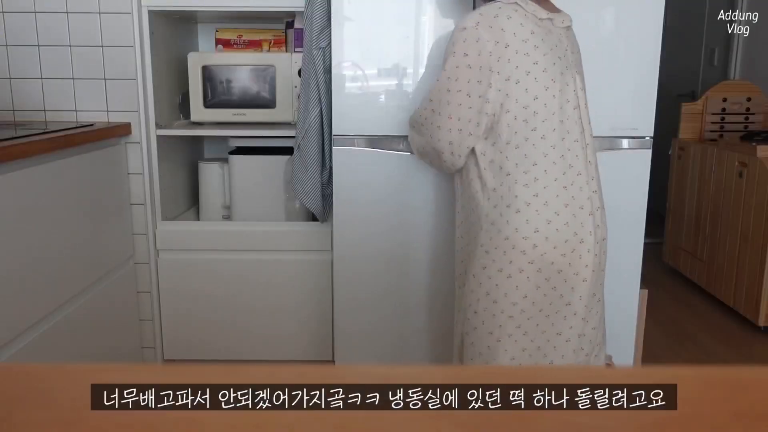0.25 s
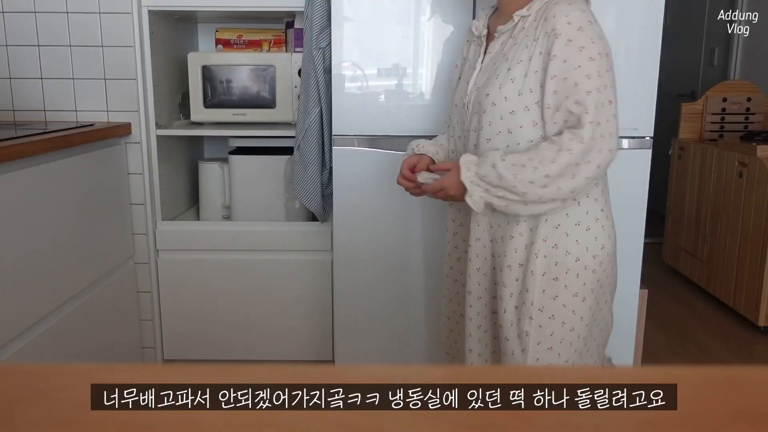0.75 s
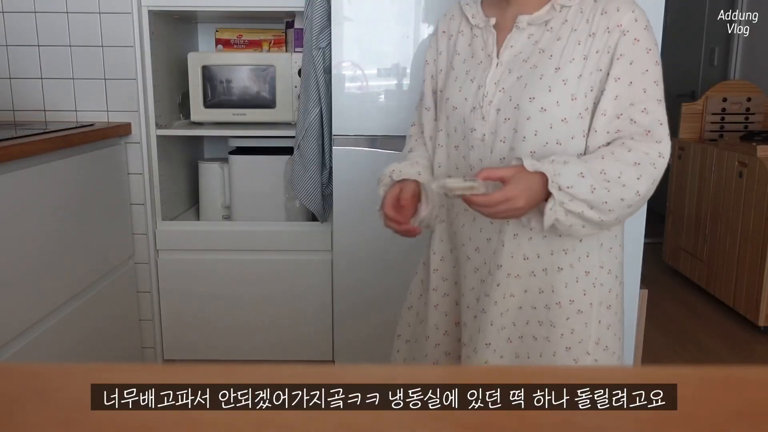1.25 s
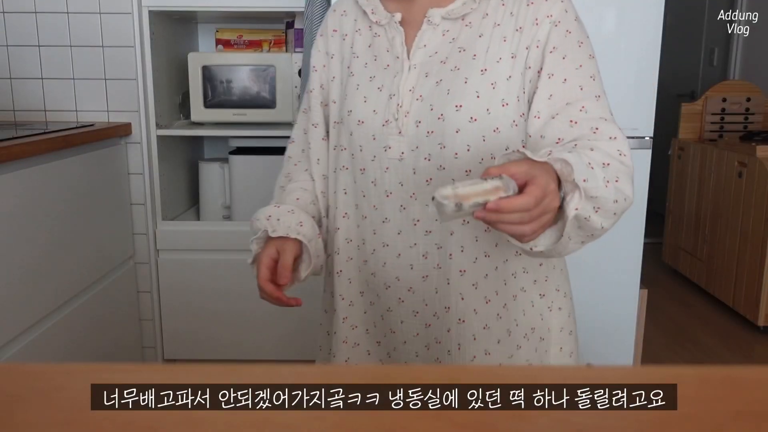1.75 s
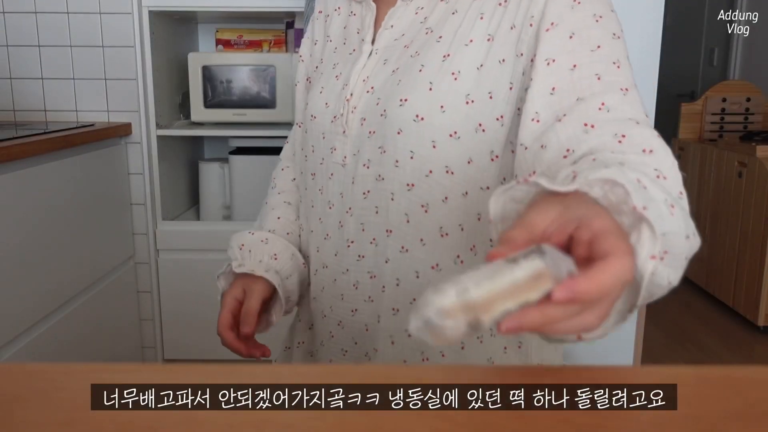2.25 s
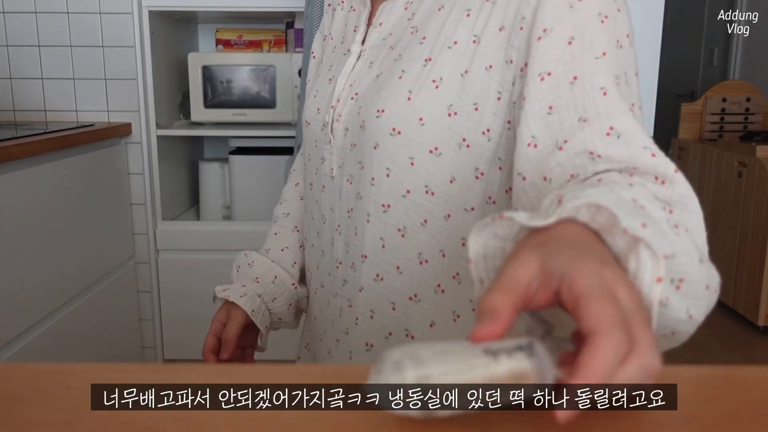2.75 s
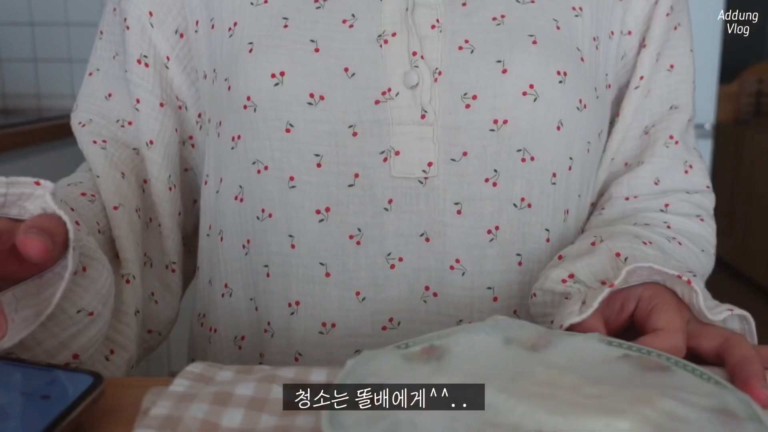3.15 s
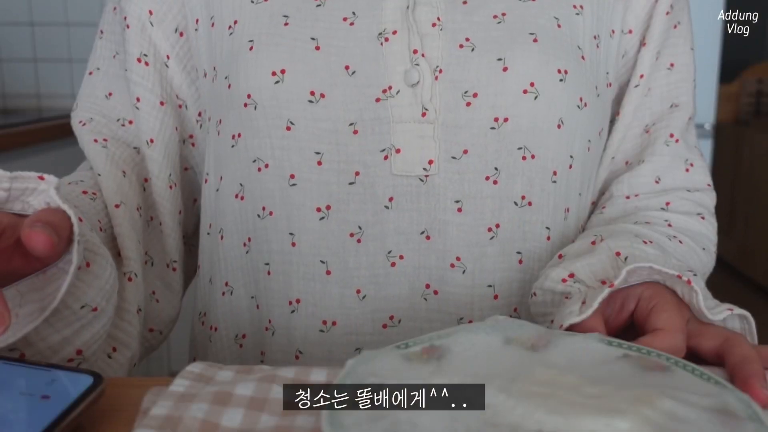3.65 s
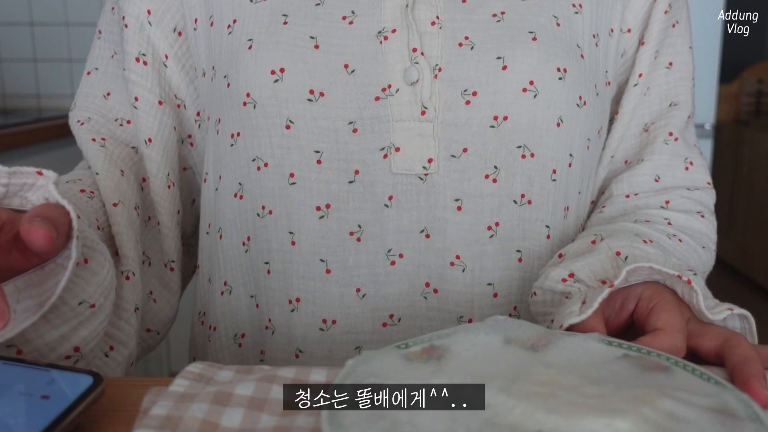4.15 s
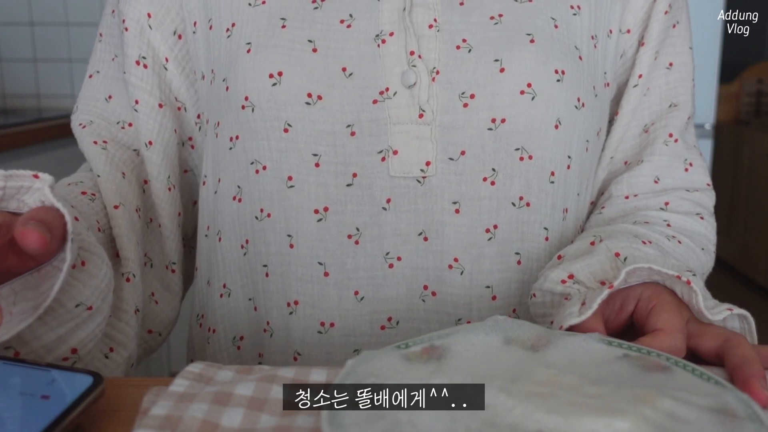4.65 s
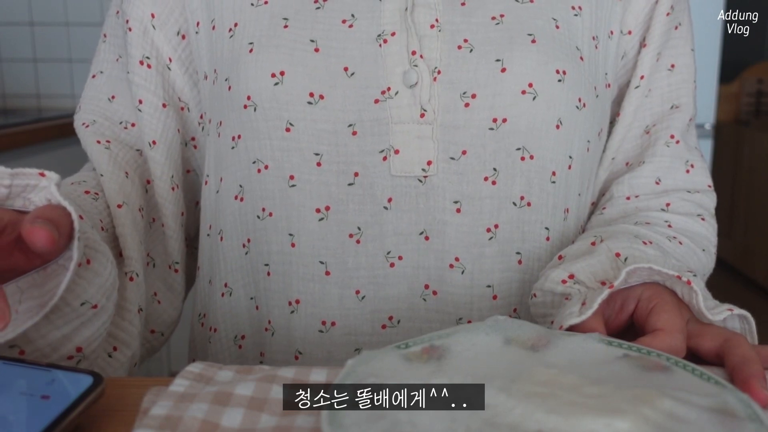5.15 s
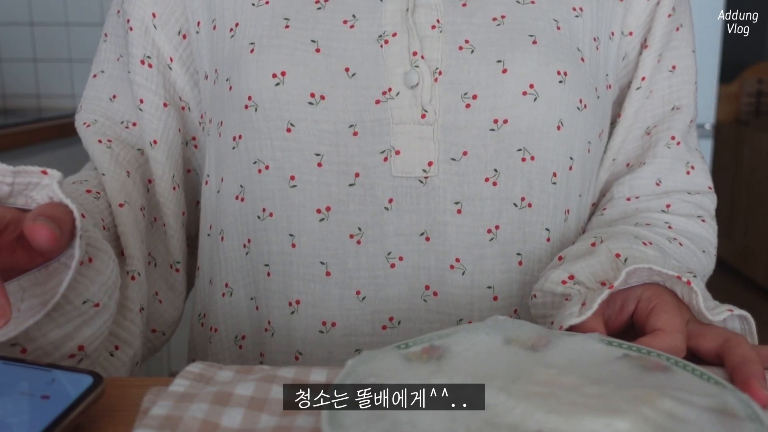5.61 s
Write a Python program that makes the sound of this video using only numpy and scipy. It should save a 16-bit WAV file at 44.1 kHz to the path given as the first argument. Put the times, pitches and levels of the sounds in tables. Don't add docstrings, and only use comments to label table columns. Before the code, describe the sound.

Stereo microphones on a kitchen table catch the tail of a door slam, then near silence. A hand carries a wrapped frozen parcel nearer, its film snapping sharply and rustling in bursts, with small dull knocks and a firm final one. Abruptly, a robot vacuum takes over at close range, its steady airy roar and wavering whine broken by a few hollow plastic rattles.

```python
import sys
import numpy as np
from scipy import signal
from scipy.fft import rfft, irfft, next_fast_len
from scipy.io import wavfile

SR = 44100
rng = np.random.default_rng(int(sys.argv[2]) if len(sys.argv) > 2 else 0)


def output_pcm(signal):
    pcm = np.clip(np.atleast_2d(signal).T, -1, 1) * 32767
    wavfile.write(sys.argv[1], SR, np.round(pcm).astype(np.int16))


def convert_level_to_amplitude(level_db):
    exponent = np.asarray(level_db, float) / 20
    return 10 ** exponent


N = 259308
TIME = np.arange(N) / SR
FREQ = np.maximum(np.fft.rfftfreq(N, 1 / SR), 1)


def at_hz(points, hz):
    table_hz, value = np.transpose(points)
    return np.interp(np.log(hz), np.log(table_hz), value)


def rms_one(x):
    return x / np.sqrt(np.mean(x ** 2) + 1e-20)


def drift(rate_hz):
    knots = rng.standard_normal(400)
    return np.interp(TIME * 2 * rate_hz, np.arange(len(knots)), knots) * np.sqrt(3 / 2)


def stereo_noise(gain, likeness):
    mid, side = rfft(rng.standard_normal((2, N)))
    alike = np.sqrt(np.clip(at_hz(likeness, np.maximum(FREQ, 150)), 0, 1))
    return gain * (np.sqrt(1 + alike) * mid + np.sqrt(1 - alike) * side * [[1], [-1]])


def kitchen_noise(spectrum):
    # pitch_hz, left_right_likeness (0 to 1)
    kitchen_likeness = [(60, 0.73), (180, 0.95), (550, 0.62), (1650, 0.074), (4970, 0.16), (15000, 0.58)]
    return rms_one(irfft(stereo_noise(convert_level_to_amplitude(at_hz(spectrum, FREQ)), kitchen_likeness), N))


def resonance(x, hz, width_hz):
    r = np.exp(-np.pi * width_hz / SR)
    poles = [1, -2 * r * np.cos(2 * np.pi * hz / SR), r * r]
    return signal.lfilter([(1 - r * r) / 2, 0, (r * r - 1) / 2], poles, x)


def room(x, alike):
    # pitch_hz, t60_s
    room_t60 = [(200, 0.9), (1000, 0.24), (4000, 0.25), (12000, 0.27)]
    # delay_s, level_db
    echoes = [(.0055, -8.5), (0.0114, -8.5), (0.022, -11)]
    t = TIME[:SR // 2]
    mid, side = rng.standard_normal((2, len(t)))
    white = np.array([mid + (1 - alike) * side, mid - (1 - alike) * side])
    edges = 150 * 2 ** np.arange(0, 7.1)
    tail = 0
    for lo, hi in zip(edges, edges[1:]):
        octave_band = signal.butter(2, [lo, hi], "band", fs=SR, output="sos")
        decay = convert_level_to_amplitude(-60 * t / at_hz(room_t60, np.sqrt(lo * hi)))
        tail = tail + signal.sosfilt(octave_band, white) * decay
    onset = np.clip((t - 0.002) / 0.0045, 0, 1)
    tail = tail * onset / np.sqrt(np.sum(tail ** 2) / 2)
    for s, db in echoes:
        tail = tail + convert_level_to_amplitude(db) * white * (t > s) * np.exp(-np.abs(t - s) / 0.00014) / 5
    return signal.fftconvolve(x[None], tail, axes=1)[:, :N]


def crease_slip(db, fold, on_table, size_chance, level_chance):
    # pitch_hz, width_hz
    film_ranges = [(1650, 1650), (2900, 4150), (5400, 3630), (9800, 6500)]
    fold_db_per_oct2, scatter_db = 10.5, 2.5
    big_snap_broader = 0.012
    skirt = 2.4
    click = 1. * (TIME[:900] == 0)
    range_hz = np.array(film_ranges)[:, 0]
    octaves = np.log2(range_hz / range_hz[0])
    narrowness = fold_db_per_oct2 * (1 - big_snap_broader * (db + 33.5))
    shares_db = -narrowness * (octaves - fold) ** 2 + scatter_db * 2 * (level_chance - 0.5)
    shares_db[-1] += -11 * on_table
    slip = 0
    for k, (share_db, (hz, width_hz)) in enumerate(zip(shares_db, film_ranges)):
        hz = hz * (0.88 + 0.24 * size_chance[k])
        ring = resonance(resonance(click, hz, width_hz), hz, skirt * width_hz)
        slip = slip + convert_level_to_amplitude(share_db) * (-1) ** k * rms_one(ring)
    table_ring = rms_one(resonance(click, 1730, 340))
    slip = slip + on_table * convert_level_to_amplitude(-13) * table_ring
    return slip / np.abs(slip).max()


def snaps():
    # start_s, peak_db, fold_pitch (octaves above the lowest range)
    snap_events = [(0.1322, -39.5, 0.69), (0.283, -39, 1.28), (0.657, -26, .55), (0.6653, -42, 0.49),
                   (0.7388, -34.5, .9), (0.843, -24.5, 1.29), (0.893, -28, 1.6), (0.9374, -14, 1.38),
                   (0.947, -23, .9), (0.989, -16.5, 0.39), (0.9986, -14, 1.6), (1.0214, -10, 1.36),
                   (1.058, -14.5, 1.32), (1.0815, -16.5, 1.4), (1.2303, -36.5, 1), (1.2605, -39.5, 0.48),
                   (1.334, -41.5, -1.3), (1.4014, -40, 1.9), (1.439, -26, 1.13), (1.4714, -32.5, 1.56),
                   (1.57, -49, -0.91), (1.717, -27.5, 0.19), (1.7231, -18, 1.27), (1.783, -28.5, 1.43),
                   (1.804, -32.5, 1.4), (1.8203, -33, 1.3), (1.8517, -36.5, 0.94), (1.9145, -42, 1.4),
                   (2.0095, -30, 1.9), (2.026, -38, 1.8), (2.0732, -18, 1.45), (2.0901, -25, 0.93),
            (2.1725, -25.5, 1.3), (2.2225, -19, 1.27), (2.3135, -21, 1.46), (2.4485, -16.5, 2.03),
            (2.546, -31, 0.52), (2.5499, -27, 1.33), (2.5732, -26, 1.5), (2.5857, -27, .7),
            (2.5954, -20, 1.1), (2.6273, -16.5, 1.23), (2.6787, -32, 0.87), (2.687, -22, 0.86),
            (2.7841, -26, 0.44), (2.8097, -29.5, 0.27), (2.8157, -26.5, .4), (2.8758, -11, 1.27)]
    laid_down_s = 2.43
    direct_db, closer_db_per_s = -4.5, 1.64
    wet_db, drier_db_per_s = -1.5, 2.97
    big_snap_drier = 0.081
    dry, wet, t = np.zeros(N), np.zeros(N), TIME[:900]
    for s, db, fold in snap_events:
        chance, hiss = rng.random(11), rng.standard_normal(len(t))
        slip = crease_slip(db, fold, s > laid_down_s, chance[3:7], chance[7:])
        lags = (SR * (0.0004 + 0.00099 * np.cumsum(chance[:3]))).astype(int)
        snap = 0.68 * slip + np.roll(slip, lags[0])
        snap = snap - 0.5 * np.roll(slip, lags[1]) + 0.62 * np.roll(slip, lags[2])
        chatter = hiss ** 3 / 4 * np.exp(-t / 0.016)
        snap = snap + convert_level_to_amplitude(-25) * np.convolve(chatter, slip)[:len(t)]
        at = round(s * SR)
        near_db = db + direct_db + closer_db_per_s * s
        room_db = db + wet_db - drier_db_per_s * s - big_snap_drier * (db + 22)
        dry[at:at + len(t)] += convert_level_to_amplitude(near_db) * snap / np.abs(snap).max()
        wet[at:at + len(t)] += convert_level_to_amplitude(room_db) * slip
    return dry + convert_level_to_amplitude(9.5) * room(wet, alike=0.7)


def squeezing():
    # start_s, level_db, hold_s, fading_db_per_s
    squeezes = [
        (0.649, -54, .04, 60),
        (0.717, -51, 0.041, 70),
        (.845, -51, .09, 60),
        (0.939, -31.5, 0.13, 140),
        (1.421, -53, 0.055, 44),
        (1.7, -46.5, 0.052, 38),
        (2.063, -45, 0.041, 42),
        (2.505, -45, 0.12, 48),
        (2.86, -52, .1, 30),
    ]
    attack_s = 0.01
    power = 0
    for s, db, hold_s, fall_db in squeezes:
        rise = np.clip((TIME - s) / attack_s, 0, 1) ** 2
        power = power + rise * convert_level_to_amplitude(2 * (db - fall_db * np.maximum(TIME - s - hold_s, 0)))
    return 10 * np.log10(power + 1e-12)


def rustle():
    # pitch_hz, level_db (per Hz)
    film_colour = [(300, -33), (550, -11.5), (1050, -0.5), (2200, -7.5), (3200, -9), (5200, -1.5),
                   (7000, -8), (10000, -8), (13000, -26), (16000, -20)]
    level_db = squeezing()
    per_s = np.maximum(3000 + 55.5 * (level_db + 27), 800)
    sizes = convert_level_to_amplitude(3.2 * np.minimum(rng.exponential(1, N), 3.5)) * rng.choice([-1, 1], N)
    clicks = sizes * (rng.random(N) < per_s / SR) / np.sqrt(np.maximum(per_s, 1))
    film = rms_one(irfft(rfft(clicks) * convert_level_to_amplitude(at_hz(film_colour, FREQ)), N))
    film = film * convert_level_to_amplitude(level_db - 8.0)
    return film + convert_level_to_amplitude(0.5) * room(film, alike=0.54)


def knocks():
    # start_s, peak_db, pitch_hz
    knock_events = [(1.334, -43.5, 960), (1.337, -43, 1400), (1.44, -37.5, 1520), (1.571, -46, 1640),
                    (1.724, -38.5, 1060), (2.074, -48, 700), (2.223, -47.5, 634), (2.450, -47.5, 340),
                    (2.45, -35.5, 965), (2.596, -37, 400), (2.629, -44, 330), (2.785, -45, 462),
                    (2.877, -44, 467), (2.877, -17.5, 1800)]
    out, t = np.zeros(N), TIME[:2000]
    for s, db, hz in knock_events:
        at = round(s * SR)
        out[at:at + len(t)] += convert_level_to_amplitude(db - 60 * t * hz / 22) * np.sin(2 * np.pi * hz * t)
    bass_cut = signal.butter(3, 150, "high", fs=SR, output="sos")
    out = signal.sosfilt(bass_cut, out)
    return out + convert_level_to_amplitude(-6) * room(out, alike=0.67)


def slam():
    # pitch_hz, level_db (per Hz)
    boom_colour = [(24, -58), (40, -32), (102, -25), (182, -5.5), (225, -6.5), (372, -9), (407, -9),
                   (1500, -16), (1950, -40), (3300, -120)]
    # pitch_hz, level_db (per Hz)
    clatter_colour = [(590, -31), (1000, -19), (1660, -4), (1790, 0), (2340, -5), (2770, -4), (3040, -6),
                      (8640, -24.5), (15500, -39)]
    late = convert_level_to_amplitude(-45 * TIME)
    boom = convert_level_to_amplitude(-28 - 130 * TIME) + convert_level_to_amplitude(-63) * late
    clatter = convert_level_to_amplitude(-30 - 218 * TIME) + convert_level_to_amplitude(-57) * late
    return boom * kitchen_noise(boom_colour) + clatter * kitchen_noise(clatter_colour)


def air_rush():
    # pitch_hz, level_db (per Hz)
    air_colour = [(15, -83), (25, -59), (123, -17), (263, -4), (439, -6.5), (489, -5.5), (1190, -7),
                  (1290, -7), (2160, -8.5), (3160, -7), (3430, -9), (4490, -7.5), (8590, -18.5),
                  (10100, -19.5), (16000, -40)]
    # pitch_hz, width_hz, boost_db
    shell = [(106, 39, -8.5), (356, 90, 10), (446, 16.4, 11), (639, 23, 8), (700, 18, 8), (892, 18, 5.5),
             (1038, 71, 5), (1302, 76, 9), (1590, 110, 3.5), (1800, 81, 3.5), (2540, 85, 5.5),
             (2853, 52, 6), (10130, 410, 5.5)]
    # pitch_hz, left_right_likeness (0 to 1)
    air_likeness = [(60, 0.9), (150, 0.88), (380, 0.99), (950, 0.82), (2380, 0.91), (5980, 0.42),
                    (15000, 0.26)]
    rumble_db, shell_db, hiss_db = -41.5, -35.5, -39.5
    boost_db = sum(db / (1 + (2 * (FREQ - hz) / width) ** 2) for hz, width, db in shell)
    spectra = stereo_noise(convert_level_to_amplitude(at_hz(air_colour, FREQ) + boost_db), air_likeness)
    low = 1 / (1 + (FREQ / 800) ** 4)
    high = 1 / (1 + (2800 / FREQ) ** 4)
    air = 0
    for db, share in ((rumble_db, low), (shell_db, 1 - low - high), (hiss_db, high)):
        air = air + convert_level_to_amplitude(db + 0.93 * drift(9)) * rms_one(irfft(spectra * share, N))
    return air


def fan():
    # time_s, blade_passing_hz, whine_db
    fan_path = [(2.95, 3226, -42), (3.05, 3228, -42.5), (3.14, 3238, -47), (3.25, 3242, -43),
                (3.8, 3236, -41.5), (4.25, 3242, -50), (4.4, 3248, -41), (4.55, 3248, -56),
                (4.8, 3236, -52), (5.25, 3245, -40), (5.6, 3244, -52), (5.88, 3252, -53)]
    blades, shaft_db, octave_db = 12, -50.5, -16.5
    s, hz, db = np.transpose(fan_path)
    blade_hz, whine_db = np.interp(TIME, s, hz), np.interp(TIME, s, db)
    phase = 2 * np.pi * np.cumsum(blade_hz + 1.0 * drift(13)) / SR
    whine = np.sin(phase) * convert_level_to_amplitude(1.2 * drift(10))
    whine = whine + convert_level_to_amplitude(octave_db + 5.0 * drift(17)) * np.sin(2 * phase)
    shaft = convert_level_to_amplitude(shaft_db + 2 * drift(4)) * np.sin(phase / blades)
    return np.sqrt(2) * (convert_level_to_amplitude(whine_db) * whine + shaft)


def brush():
    brush_orders = [(4, -54), (5, -62), (6, -61), (7, -57), (8, -58), (10, -63)]
    turning_hz = 263.6
    phase = 2 * np.pi * np.cumsum(turning_hz * (1 + 0.00276 * drift(5.5))) / SR
    return np.sqrt(2) * sum(convert_level_to_amplitude(db + 5.8 * drift(5)) * np.sin(round(k) * phase) for k, db in brush_orders)


def bumps():
    # start_s, peak_db
    ridges = [
        (2.963, -29),
        (5.168, -19),
        (5.20, -17.5),
        (5.234, -34),
        (5.269, -41),
        (5.307, -19.5),
        (5.529, -21),
    ]
    # pitch_hz, width_hz, level_db
    bumper = [(1150, 120, -21), (1298, 78, 1.5), (1753, 124, -1)]
    shake = sum(convert_level_to_amplitude(db) * (TIME > s) * np.exp(-np.abs(TIME - s) / 0.021) for s, db in ridges)
    shake = resonance(shake * rng.standard_normal(N), 1450, 1300)
    body = sum(convert_level_to_amplitude(db + 12.0) * resonance(shake, hz, width) for hz, width, db in bumper)
    return convert_level_to_amplitude(-5.5) * body + convert_level_to_amplitude(-7.5) * room(body, alike=0.46)


def kitchen_air():
    # pitch_hz, level_db (per Hz)
    home_colour = [(25, -62), (60, -28.5), (120, -22), (170, -5), (300, -1.5), (380, -6.5), (480, -13),
                   (800, -17), (1400, -20.5), (1850, -19.5), (2250, -23.5), (2500, -34), (6000, -36),
                   (16000, -42)]
    return convert_level_to_amplitude(-55 + drift(7)) * kitchen_noise(home_colour)


def scene():
    change_s = 2.9555
    after = np.clip((TIME - change_s) / 0.0054, 0, 1)
    kitchen = snaps() + rustle() + knocks() + slam() + kitchen_air()
    vacuum = air_rush() + fan() + brush() + bumps()
    pop = convert_level_to_amplitude(-45) * after * np.exp(-np.abs(TIME - change_s) / 0.0033)
    return (1 - after) * kitchen + after * vacuum + pop


def low_pass(x):
    return signal.sosfilt(signal.butter(12, 16510, fs=SR, output="sos"), x)


def record(dry):
    # pitch_hz, level_db
    left_right = [(60, -5), (130, -0.2), (290, -0.5), (640, -2), (1410, -2), (3100, -2), (6820, -2.5),
                  (15000, -0.5)]
    top_hz = 15780
    size = next_fast_len(N + SR // 2)
    hz = np.maximum(np.fft.rfftfreq(size, 1 / SR), 1)
    balance_db = at_hz(left_right, hz) / 2 * [[1], [-1]]
    top_cut_db = 32 / (1 + np.exp((top_hz - hz) / 40))
    mix = irfft(rfft(dry, size) * convert_level_to_amplitude(balance_db - top_cut_db), size)[:, :N]
    return low_pass(mix)


dry = scene()
out = record(dry)
output_pcm(out)
```